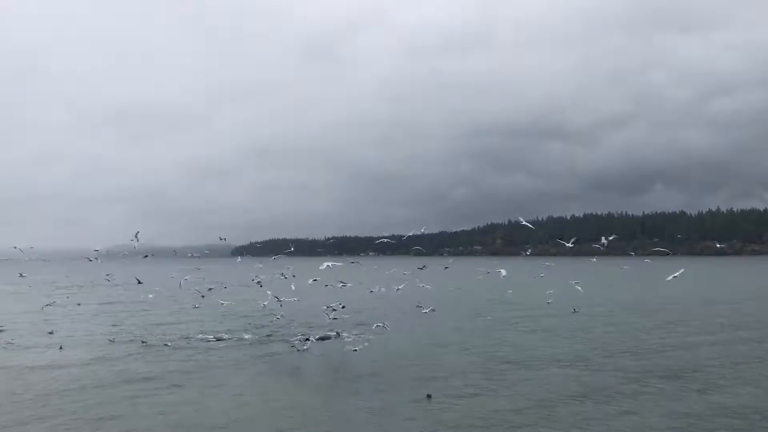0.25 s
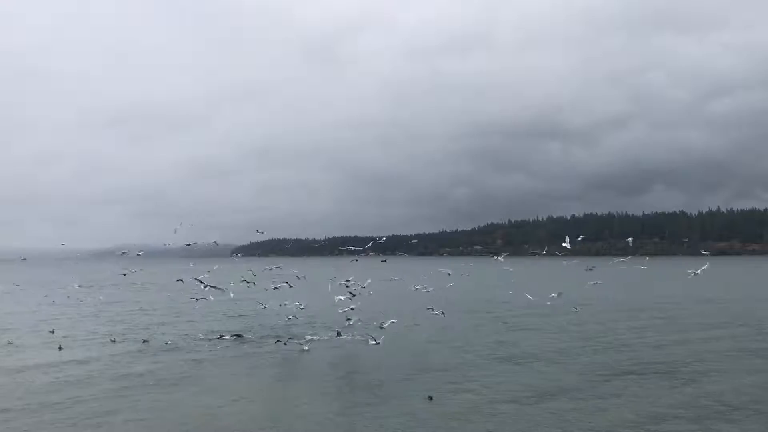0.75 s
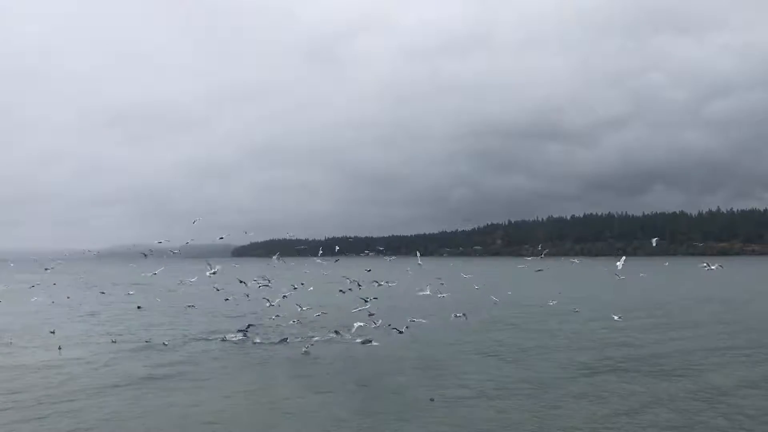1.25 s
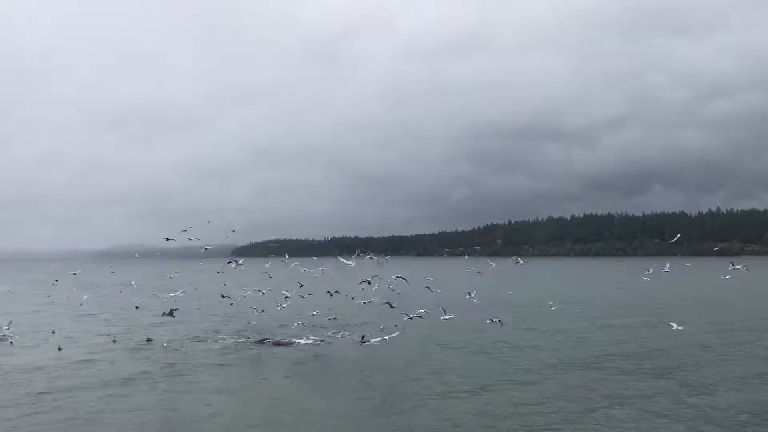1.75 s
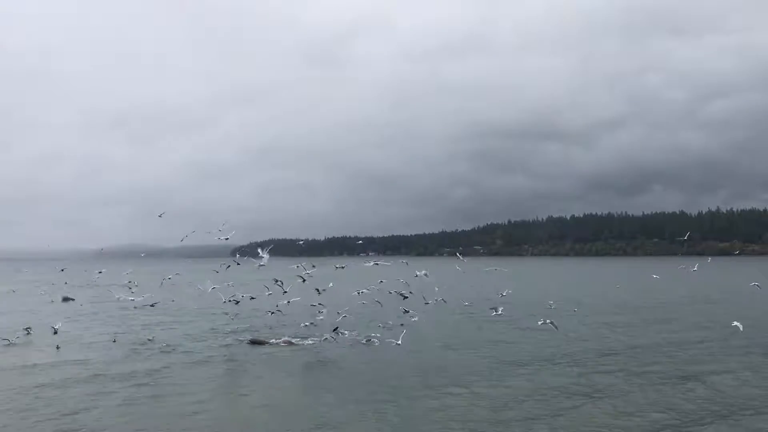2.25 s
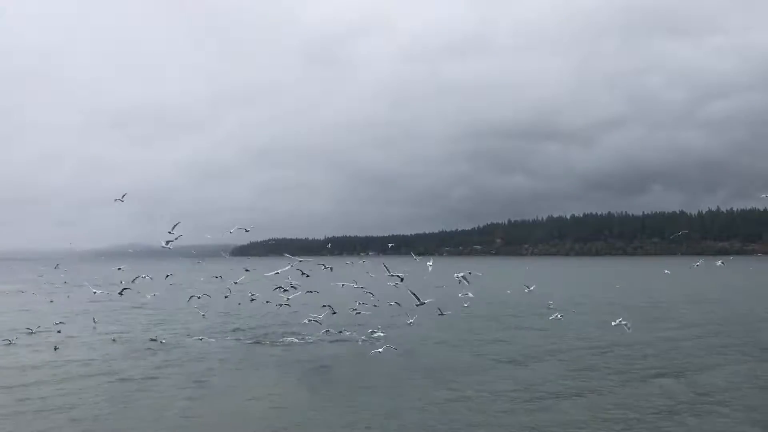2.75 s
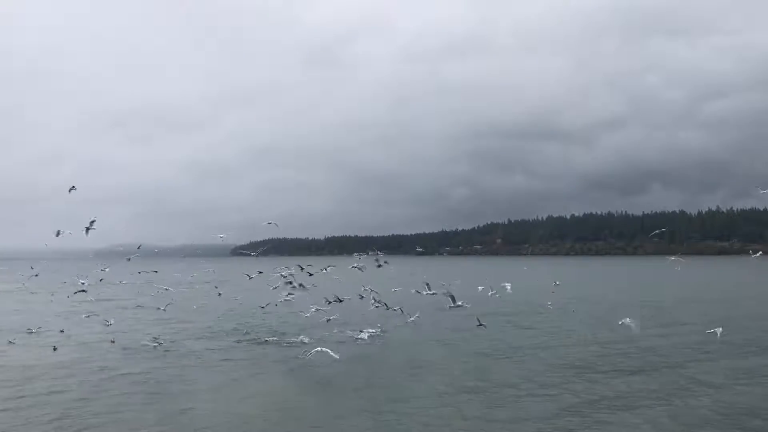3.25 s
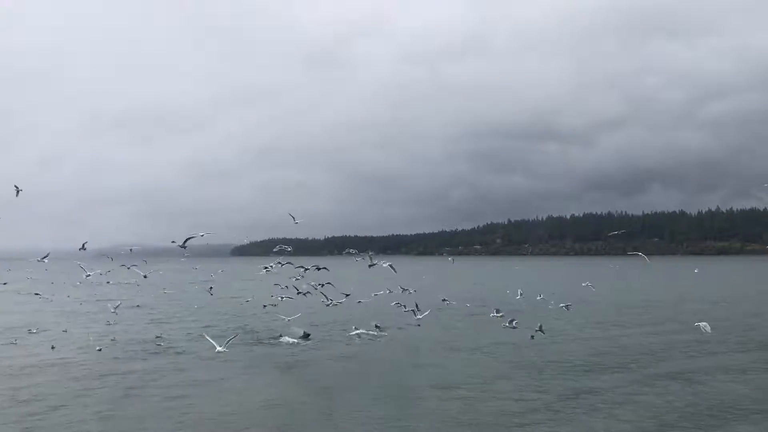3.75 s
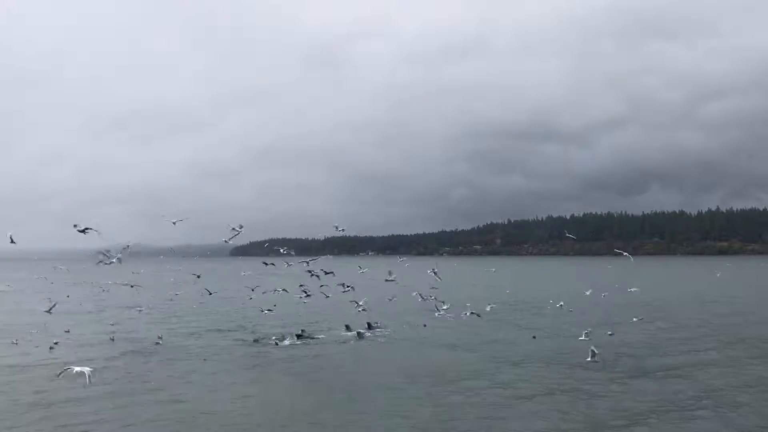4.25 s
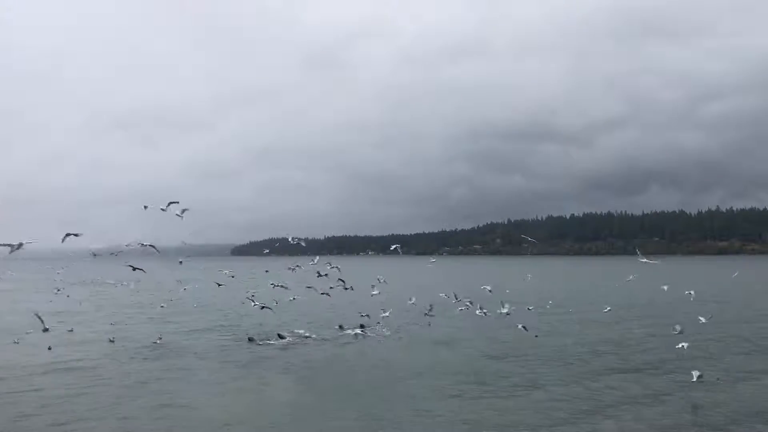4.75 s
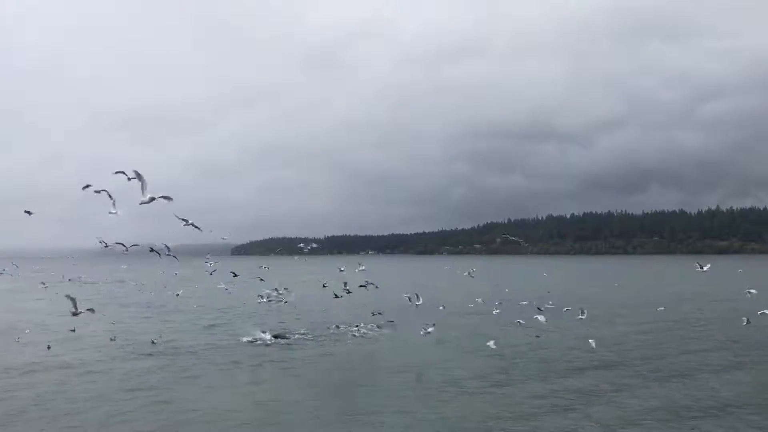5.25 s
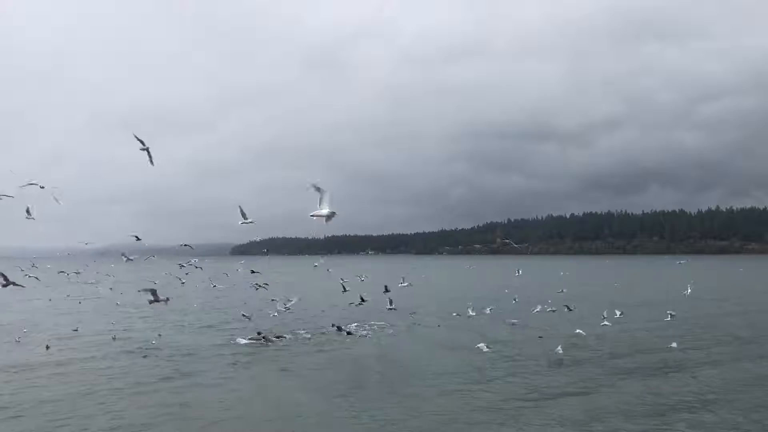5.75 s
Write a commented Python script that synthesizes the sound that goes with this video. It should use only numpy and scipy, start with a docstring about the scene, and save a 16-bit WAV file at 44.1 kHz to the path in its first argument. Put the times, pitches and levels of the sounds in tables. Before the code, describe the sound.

Many gulls feeding over a bay cry in short, clear, mostly falling yelps, overlapping thickly, with brief hoarse squawks between and a blurred chorus farther off. The calls are densest in the first half and around two to three seconds, then grow sparser. Soft water wash and faint hissing splashes lie below. Wind rumbles and bumps on the microphone. Open outdoor space, dull faint reflections, mono.

```python
"""Gulls feeding over a bay: near birds give short clear cries, hoarse squawks between, far ones blur to a chorus.
Cries are stacks of partials on gliding pitches; a few dull reflections follow them.
Water washes, sprays and ticks below: flickering noise bands and high-passed clicks.
Wind rumbles, flutters and buffets on the microphone port: low noise bands under swells and puffs."""
import sys
import numpy as np
from scipy import signal
from scipy.io import wavfile
from scipy.ndimage import uniform_filter1d

SR = 44100
rng = np.random.default_rng(int(sys.argv[2]) if len(sys.argv) > 2 else 0)


def volts_from_db(level):
    """Convert decibel levels to linear amplitude ratios."""
    exponent = np.asarray(level, float) / 20
    return 10 ** exponent


def transcribe(signal):
    """Save signal, clipped to [-1, 1], as a 16-bit WAV file at the path in sys.argv[1]."""
    frames = np.atleast_2d(signal).T
    limited = np.clip(frames, -1, 1)
    pcm = np.round(limited * 32767).astype(np.int16)
    wavfile.write(sys.argv[1], SR, pcm)


N = 265041

# throat response of far birds and squawks: freq_hz, gain_db
THROAT = [(1000, -3.5), (1500, -1), (2200, -3), (3200, 4), (4500, -10.5), (7000, -18.5), (11000, -48.5)]


def rms_one(x):
    return x / np.sqrt(np.mean(x ** 2) + 1e-20)


def in_time(rows):
    """Each column after the first, interpolated over time to every sample."""
    s, *columns = np.transpose(rows)
    return [np.interp(np.arange(N) / SR, s, c) for c in columns]


def at_hz(points, hz):
    """Spectrum in dB, interpolated over log frequency."""
    points_hz, points_db = np.array(points).T
    return np.interp(np.log(hz), np.log(points_hz), points_db)


def drift(rate_hz):
    """Slow random drift, rms 1: noise at SR/20 through a double one-pole low-pass."""
    r = np.exp(-40 * np.pi * rate_hz / SR)
    white = rng.standard_normal(N // 20 + 2002)
    slow = signal.lfilter([1], [1, -2 * r, r * r], white)[2000:]  # settled part
    return np.interp(np.arange(N) / 20, np.arange(len(slow)), rms_one(slow))


def coloured_noise(spectrum, patchiness, rate_hz):
    """Half-octave noise bands with partly shared level flicker; rms 1."""
    lowest_hz, highest_hz = spectrum[0][0], spectrum[-1][0]
    edges_hz = lowest_hz * 2 ** np.arange(0, np.log2(highest_hz / lowest_hz) + .25, .5)
    white = rng.standard_normal((2, N))
    shared, out = drift(rate_hz), 0
    for k, (low_hz, high_hz) in enumerate(zip(edges_hz, edges_hz[1:])):
        sos = signal.butter(2, [low_hz, high_hz], "band", fs=SR, output="sos")
        band = signal.sosfilt(sos, white[k % 2])
        flicker_db = patchiness * (0.98 * shared + 0.72 * drift(rate_hz))
        out = out + band * volts_from_db(at_hz(spectrum, np.sqrt(low_hz * high_hz)) + flicker_db)
    return rms_one(out)


def add(out, cry, voice_db, waver, tremble, edge_s=.005):
    """Adds one cry: partials of a gliding, wavering pitch, each trembling in level."""
    s, hz, db = np.transpose(cry)
    first = max(int((s[0] - edge_s) * SR), 0)
    span = np.arange(first, min(int((s[-1] + edge_s) * SR), N))
    t = span / SR
    glide_hz = uniform_filter1d(np.interp(t, s, hz), size=300, mode="nearest")
    phase = 2 * np.pi * np.cumsum(glide_hz * waver[span]) / SR
    edges = np.clip(np.minimum(t - t[0], t[-1] - t) / edge_s, 0, 1)
    stack = 0
    for k, partial_db in enumerate(voice_db, 1):
        if partial_db > -38 and k * hz.max() < 16000:
            own_tremble = np.roll(tremble, 7919 * k + 3 * span[0])[:len(span)]
            stack = stack + volts_from_db(partial_db) * np.sin(k * phase) * own_tremble
    out[span] += np.sqrt(2) * volts_from_db(np.interp(t, s, db)) * edges * stack


def voice(hz, tilt_db):
    """Partials tilted by effort and coloured by the throat; the strongest is 0 dB."""
    # near throat response: freq_hz, gain_db
    near_throat = [(1000, 0), (1500, -3.5), (2200, -0.5), (3200, 1), (4500, -7.5), (7000, -21.5),
                   (10000, -31.5), (13000, -46), (16000, -55)]
    k = np.arange(1, 11)
    effort_db = tilt_db * np.log2(np.minimum(k, 2))  # one step, from the second partial up
    upper_loss_db = 3 * np.maximum(k - 2, 0)
    db = effort_db - upper_loss_db + at_hz(near_throat, hz * k)
    return db - db.max()


def envelope(u, length_s):
    """Cry level in dB over u = 0-1: quick rise, sagging hold, release."""
    attack_s, rise_db, hold_share, release_db, sag_db_per_s = 0.022, 8, 0.82, 9, 37
    rise = min(attack_s / length_s, .4)
    shape_db = np.interp(u, [0, rise, hold_share, 1], [-rise_db, 0, 0, -release_db])
    return shape_db - sag_db_per_s * length_s * u


def near_gulls():
    """Gliding cries fall early or rise late; warbles swing about a pitch; contoured cries follow pitch curves."""
    # gliding cries: start_s, length_s, first_pitch_hz, last_pitch_hz, strongest_partial_db, tilt_db
    cries = [ (0.005, 0.015, 2870, 2800, -41.5, -8), (2.2, 0.11, 4650, 4350, -47, -8),
             (2.04, .06, 4450, 4300, -50, -8), (0.064, 0.28, 2940, 2695, -32, -20),
             (0.068, 0.12, 3080, 2840, -40.5, 4), (0.16, 0.049, 3390, 3520, -32.5, -5),
             (0.31, .09, 3250, 3100, -46, -8), (0.395, .035, 3050, 2950, -43, -8),
             (0.7, .06, 3050, 2800, -44, -8), (0.955, .04, 2600, 2620, -48, 12),
             (0.21, .1, 4120, 3880, -41, -11), (0.201, .12, 1400, 1240, -44.5, -4.5),
             (0.34, 0.039, 2530, 2100, -42, -26), (0.374, 0.03, 1990, 1885, -30, -11),
             (0.432, .022, 2880, 2800, -38, -8), (0.453, 0.029, 2690, 2714, -33.5, 0.5),
             (0.442, .02, 1907, 1915, -39, -20), (0.514, 0.024, 2690, 2450, -32, 1.5),
             (0.48, .07, 3480, 3410, -38.5, -2), (0.567, 0.027, 3380, 3320, -40.5, -4),
             (0.576, .022, 2680, 2220, -39, -8), (0.588, 0.021, 2430, 2250, -41.5, 7),
             (0.609, 0.075, 3370, 3200, -34, -17), (0.612, 0.027, 1322, 1260, -36, -14),
             (0.68, 0.029, 3820, 3870, -36, -16), (0.656, .022, 2340, 2260, -41, -13),
             (0.669, 0.021, 2793, 2580, -34.5, -18), (0.671, 0.017, 1373, 1324, -36, -24),
             (0.674, 0.088, 1520, 1380, -41, -8), (0.689, 0.041, 2450, 2320, -40.5, -17),
             (1.16, .02, 8800, 9800, -60, -8), (1.245, .03, 8000, 9800, -60, -8),
             (1.37, 0.046, 5200, 4700, -48, -8), (1.102, .06, 3060, 2750, -43, -8),
             (0.684, .22, 4540, 4400, -62, -6), (0.928, 0.052, 3640, 3760, -47, 15.5),
             (0.97, 0.026, 3900, 3930, -41, -5), (0.782, 0.037, 1450, 1490, -41, -10),
             (0.85, 0.033, 3820, 3675, -39.5, -8), (0.853, 0.16, 1902, 1672, -39.5, -10),
             (0.974, 0.037, 1319, 1300, -43, 9), (1.02, 0.028, 3510, 3550, -40, 6),
             (1.026, .065, 2580, 2340, -41, -7), (1.05, 0.042, 3100, 2990, -36, -10),
             (1.072, 0.087, 1570, 1330, -27.5, -16.5), (1.076, 0.055, 1654, 1600, -34.5, -10),
             (1.127, 0.1, 1793, 1624, -37, 4), (1.16, 0.13, 4460, 4130, -44, 6.5),
             (1.244, 0.11, 2795, 2840, -46, 16), (1.274, 0.035, 3440, 3450, -42, -10),
             (1.336, .025, 3360, 3210, -44, -8), (1.37, .085, 3360, 3330, -34, -5),
             (1.396, 0.023, 5570, 5660, -47, -6), (1.53, .09, 3150, 3050, -44, -8),
             (1.715, .025, 4050, 4000, -46, -8), (1.7, .02, 2200, 2180, -44, -12),
             (1.84, .025, 2450, 2550, -45, -8), (1.92, .025, 3750, 3850, -47, -8),
             (1.28, .05, 2620, 2770, -45, -8), (1.39, .04, 2750, 2850, -43, -8),
             (1.512, .03, 3760, 3870, -42, -4), (1.517, 0.25, 3506, 3140, -37, -1),
             (1.592, 0.015, 3800, 3750, -43, -8), (1.664, 0.036, 3020, 2920, -38.5, -3),
             (1.863, 0.01, 3240, 3150, -47, -8), (1.887, .025, 3230, 3160, -43.5, -8),
             (2.039, 0.2, 1830, 1660, -42.5, 3), (2.105, 0.021, 2550, 2430, -37, -3),
             (2.105, 0.028, 4160, 4160, -43, -8), (2.13, 0.048, 2040, 2100, -40, -20),
             (1.12, 0.085, 3560, 3200, -49, -8), (4.218, .11, 4600, 4540, -47, -8),
             (4.4, 0.026, 5000, 5000, -50, -8), (2.13, 0.078, 3225, 3170, -33, -1),
             (2.22, 0.14, 2557, 2485, -43, -1), (2.343, 0.058, 1830, 1686, -38, 1.5),
             (2.35, 0.039, 3160, 3250, -37, 1), (2.374, 0.031, 2770, 2680, -34.5, -17),
             (2.407, 0.065, 2820, 2790, -38, -8), (2.421, 0.027, 4370, 4300, -37, -14),
             (2.441, 0.038, 4320, 4400, -37, 2), (2.442, .05, 984, 1055, -38.5, -25),
             (2.485, .065, 4070, 4260, -35.5, -4), (2.471, .04, 3350, 3190, -31, -8),
             (2.498, 0.13, 1526, 1390, -42, -10), (2.507, 0.047, 2713, 2790, -31.5, -7),
             (2.526, 0.03, 3710, 3560, -31.5, -4), (2.56, 0.045, 3440, 3510, -38, -12),
             (2.547, 0.1, 2960, 2550, -34, -13), (2.62, 0.094, 2585, 2480, -35, -9),
             (2.623, 0.017, 3300, 3150, -29, -2), (2.7, 0.031, 2480, 2385, -30.5, -6),
             (2.68, 0.051, 1412, 1375, -37, 2.5), (2.707, 0.016, 4110, 4180, -40, 0),
             (2.753, 0.12, 2450, 2400, -40, -1), (2.777, 0.099, 4260, 4044, -31.5, -13),
             (2.78, 0.097, 2100, 2010, -47, -20), (2.872, .26, 3480, 3200, -53, 16),
             (2.609, 0.034, 5120, 5220, -41, -12), (2.455, .085, 8650, 8200, -58, -8),
             (2.777, 0.018, 3780, 3530, -33, -8), (2.892, 0.078, 4000, 3990, -48, -8),
             (2.856, .112, 2890, 2650, -41.5, -5), (2.892, 0.039, 3150, 2880, -40.5, -6),
             (2.9, 0.075, 1444, 1386, -42.5, -11), (2.91, 0.18, 1907, 1875, -42.5, 2),
             (3.048, 0.041, 3740, 3570, -44, -8), (2.919, 0.078, 1830, 1626, -39.5, -19),
             (3.034, 0.19, 1674, 1552, -34.5, -21), (3.19, 0.057, 1639, 1493, -33.5, -29),
             (3.001, 0.053, 1311, 1278, -39.5, -3), (3.13, 0.028, 3490, 3520, -40, 0),
             (3.224, 0.027, 2670, 2470, -42.5, -8), (3.269, .02, 2540, 2720, -36.5, -8),
             (3.255, 0.023, 2110, 2060, -35.5, -20), (3.269, 0.032, 4120, 4430, -41, -14),
             (3.297, 0.023, 3630, 3580, -35.5, -1), (3.878, 0.055, 3050, 2980, -40.5, 1),
             (3.93, 0.03, 2960, 2880, -32.5, -7), (3.5, 0.038, 1434, 1380, -40, -12),
             (3.614, 0.024, 3760, 3980, -43, -8), (3.62, 0.12, 2900, 2740, -44, 1),
             (3.749, 0.17, 2580, 2350, -45, -1), (3.957, 0.041, 4430, 4300, -41, -8),
             (3.94, 0.049, 3650, 3900, -37, -12), (3.985, 0.21, 3394, 3084, -28.5, -3.5),
             (4.18, 0.053, 3150, 3140, -34.5, 4), (4.203, 0.074, 3710, 3470, -35.5, 1),
             (3.478, .022, 2480, 2680, -38, -12), (3.503, .025, 2450, 2400, -36, -12),
             (3.55, .022, 2500, 2660, -37, -12), (3.578, .035, 2450, 2250, -33, -12),
             (3.55, .022, 3750, 3950, -39.5, -8), (3.58, .018, 3950, 3750, -42, -8),
             (3.335, .03, 1200, 1300, -42, -20), (3.78, .05, 3520, 3500, -45, -8),
             (3.105, .07, 4900, 5200, -48, -8), (3.07, .025, 2600, 2520, -42, -8),
             (3.68, .03, 2200, 2000, -44, -12), (3.96, .04, 3420, 3440, -42, -8),
             (4.33, .04, 3470, 3450, -40, -3), (4.49, 0.035, 3560, 3490, -45, -8),
             (4.498, 0.02, 1526, 1560, -36, -14.5), (4.56, 0.021, 3600, 3530, -44, -8),
             (4.667, 0.079, 3274, 3157, -31.5, -1), (4.63, .13, 2150, 2140, -45, -12),
             (4.69, .055, 4850, 4720, -50, -8), (4.55, .04, 1200, 1190, -42, -25),
             (4.21, .04, 4050, 3980, -44, -8), (4.26, .05, 2500, 2480, -47, -8),
             (4.16, .03, 3580, 3500, -44, -8), (2.39, .09, 3680, 3600, -40, -8),
             (2.33, .08, 4420, 4380, -52, -8), (2.64, .09, 2850, 2830, -41, 4),
             (2.64, .025, 2400, 2150, -41, -8), (2.74, .09, 5300, 5200, -50, -8),
             (2.82, .05, 3330, 3320, -43, -8), (2.92, .08, 3650, 3300, -45, -8),
             (2.86, .06, 4950, 4700, -50, -8), (4.642, 0.016, 1640, 1730, -42, 5),
             (4.746, 0.12, 4620, 4500, -44.5, -1.5), (4.702, 0.077, 4060, 3600, -43, -10),
             (4.848, 0.11, 3796, 3530, -40, -4), (4.88, .05, 4450, 4250, -45, -10),
             (4.853, 0.043, 3420, 3524, -48, -8), (4.916, 0.014, 2200, 1970, -39, -13),
             (4.952, 0.025, 1820, 1980, -42.5, -11), (4.965, 0.032, 3350, 3520, -46, -6),
             (4.977, 0.015, 3100, 2940, -43, 6), (5.039, 0.032, 2340, 2550, -43, -11),
             (5.065, 0.014, 2930, 3070, -44, 6), (5.363, 0.05, 4380, 4310, -42, 2),
             (5.425, 0.033, 4220, 4240, -39.5, 5), (5.352, 0.023, 1455, 1600, -37.5, 2),
             (5.28, 0.014, 6180, 6150, -51, -8), (5.765, .015, 5950, 6000, -50, -8),
             (5.515, .025, 5900, 5800, -49, -8), (2.82, 0.092, 2950, 2800, -45, 9),
             (2.86, 0.13, 1940, 1880, -47, 10), (5.453, 0.026, 3630, 3510, -39, 4),
             (5.512, 0.033, 3400, 3260, -35.5, 2), (5.625, .045, 1330, 1360, -43, -20),
             (5.7, .1, 1400, 1415, -46, -20), (5.808, 0.18, 1638, 1480, -44.5, -24),
             (5.794, 0.089, 4600, 4360, -49, -8), (5.906, .065, 4190, 4150, -51, -4)]
    # warbling cries: start_s, length_s, pitch_hz, swing_hz, swing_rate_hz, strongest_partial_db, tilt_db
    warbles = [(3.33, 0.072, 2540, 90, 16.7, -31, 0), (3.405, 0.053, 2390, 97, 14, -36, -4.5),
               (3.505, 0.032, 3870, 80, 27, -40.5, -8), (3.625, .12, 2620, 90, 15, -40.5, 6.5),
               (4.8, 0.13, 3500, 80, 15.5, -42, -8), (4.42, 0.13, 4400, 200, 12, -53.5, -8)]
    # contoured cries, each with its own pitch curve: time_s, pitch_hz, level_db
    contoured_cries = [
        [(0.055, 1900, -46), (0.075, 1920, -38), (0.11, 1770, -38), (0.16, 1700, -42), (0.24, 1580, -47),
         (0.33, 1500, -50), (0.44, 1480, -54)],
        [(0.068, 1510, -48), (0.085, 1550, -40), (0.115, 1490, -39), (0.135, 1380, -43), (0.16, 1285, -55)],
        [(0.612, 4030, -50), (0.66, 3780, -45), (0.72, 3680, -49), (0.8, 3660, -44), (0.835, 3680, -53)],
        [(1.467, 3010, -41), (1.502, 2920, -36.5), (1.549, 2800, -42), (1.66, 2850, -49)],
        [(4.223, 3120, -46), (4.281, 3100, -40), (4.328, 2980, -42), (4.425, 2770, -45.5), (4.45, 2630, -52)],
        [(5.376, 2505, -48), (5.396, 2372, -39.5), (5.438, 2370, -38.5), (5.476, 2541, -34), (5.493, 2720, -53)],
        [(5.528, 2512, -46), (5.555, 2476, -38), (5.583, 2243, -41.5), (5.605, 2275, -40), (5.623, 2300, -56)],
    ]
    # their partials, one row per cry, first partial up: level_db
    contoured_voices = [(-4, 0, -30, -24), (-4, 0, -8, -14, -19, -26, -28, -28, -29), (0, -18.5, -23),
                        (0, -16), (0, -6, -28, -26), (0.5, -13, -29, -28, -23), (0, -8, -24)]
    out = np.zeros(N)
    waver, tremble = 1 + 0.0041 * drift(58.0), volts_from_db(2.26 * drift(47.0))
    u = np.linspace(0, 1, 21)
    for s, length_s, first_hz, last_hz, db, tilt_db in cries:
        bend = .7 if last_hz < first_hz else 1.59
        hz = first_hz + (last_hz - first_hz) * u ** bend
        cry = np.c_[s + length_s * u, hz, db + envelope(u, length_s)]
        add(out, cry, voice(hz.mean(), tilt_db), waver, tremble)
    for s, length_s, hz, swing_hz, rate_hz, db, tilt_db in warbles:
        swung_hz = hz - swing_hz * np.sin(2 * np.pi * rate_hz * length_s * u)
        cry = np.c_[s + length_s * u, swung_hz, db + envelope(u, length_s)]
        add(out, cry, voice(hz, tilt_db), waver, tremble)
    for cry, voice_db in zip(contoured_cries, contoured_voices):
        add(out, cry, voice_db, waver, tremble)
    return out


def squawks():
    """Low hoarse barks: partials of an unsteady pitch through the throat, level torn by breath noise."""
    # squawks: start_s, gain_db (ahead of the throat), length_s, final_pitch_hz
    barks = [(0.08, -66, 0.056, 770), (0.985, -49.5, 0.043, 714), (1.069, -48.5, 0.044, 417),
             (1.382, -53, 0.059, 560), (2.107, -50, 0.034, 842), (2.15, -46, 0.019, 531),
             (2.216, -49, 0.021, 476), (2.269, -48.5, 0.023, 499), (2.322, -48.5, 0.027, 520),
             (2.382, -45, 0.035, 496), (2.426, -43, 0.018, 500), (2.485, -63, 0.03, 500),
             (2.523, -48, 0.0284, 501), (2.595, -44, 0.046, 463), (2.67, -44.5, 0.013, 501),
             (2.703, -58, 0.014, 500), (2.843, -44.5, 0.068, 950), (3.263, -50, 0.029, 513),
             (3.293, -50, 0.021, 708)]
    out = np.zeros(N)
    waver, tremble = 1 + 0.022 * drift(120.0), volts_from_db(4.2 * drift(190.0))
    for s, db, length_s, hz in barks:
        cry = [(s, 0.89 * hz, db - 14.5), (s + 0.603 * length_s, 1.2 * hz, db), (s + length_s, hz, db - 5)]
        add(out, cry, at_hz(THROAT, hz * np.arange(1, 27)), waver, tremble, edge_s=0.0044)
    return out


def far_flock(count=480):
    """Many short, hoarse, falling cries at random moments through one throat, under a chorus level curve."""
    # chorus: time_s, level_db
    chorus = [(0.0, -56), (0.2, -62), (0.35, -43), (0.7, -46), (0.9, -48.5), (1.1, -37.5), (1.25, -49),
              (1.4, -41.5), (1.6, -48), (2.0, -62), (2.15, -42), (2.45, -40), (2.75, -41.5), (3.05, -38.5),
              (3.35, -51.5), (3.65, -43.5), (3.95, -44.5), (4.25, -40), (4.6, -53), (4.85, -47),
              (5.15, -53), (5.3, -43), (5.5, -52.5), (5.75, -44), (6.0, -58)]
    out = np.zeros(N)
    waver, tremble = 1 + 0.012 * drift(96.0), volts_from_db(4.1 * drift(74.0))
    for when, high, long, fall, faint in rng.random((count, 5)):
        s = when * (N / SR - .1)
        hz = 1050 * 2 ** (1.2 * high)
        length_s = 0.0194 + 0.075 * long ** 2
        last_hz = hz * (1 - 0.0643 * fall)
        cry = [(s, hz * 1.03, -8), (s + 0.277 * length_s, hz, 0), (s + length_s, last_hz, -9)]
        add(out, cry, at_hz(THROAT, hz * np.arange(1, 6)) - 10.0 * faint, waver, tremble)
    chorus_db, = in_time(chorus)
    return volts_from_db(chorus_db) * rms_one(out)


def over_water(x):
    """Eight dull, late reflections off water and shore, weaker with delay."""
    dull = signal.lfilter([.45], [1, -.55], x)
    lags = (SR * rng.uniform(0.0056, .09, 8)).astype(int)
    return sum(np.pad(dull, (lag, 0))[:N] * volts_from_db(-120 * lag / SR) for lag in lags)


def splashing():
    """Spray level in dB: a steady floor, splashes swelling and dying over it, summed in power."""
    # birds hitting the surface: peak_time_s, peak_db, half_width_s (to 1/e of power)
    splashes = [(0.02, -65, .05), (0.6, -70, .15), (0.98, -59, 0.093), (1.4, -64, .08), (2.15, -65, 0.13),
                (2.45, -64, 0.12), (2.89, -64, .09), (2.71, -63, .02), (3.3, -73, .05), (3.65, -64, 0.11),
                (3.95, -62, 0.11), (4.23, -54.5, .06), (4.41, -59.5, .04), (4.8, -64.5, 0.22),
                (5.24, -60, .07), (5.5, -60, 0.14), (5.73, -55, 0.056), (5.95, -63, 0.11)]
    floor_db = -68.5
    t, power = np.arange(N) / SR, volts_from_db(floor_db) ** 2
    for s, db, width_s in splashes:
        power = power + volts_from_db(db) ** 2 * np.exp(-((t - s) / width_s) ** 2)
    return 10 * np.log10(power)


def water():
    """Broad wash noise, brighter spray when birds hit the surface, and high-passed clicks for close drops."""
    # wash level: time_s, level_db
    waves = [(0.0, -40), (0.2, -42), (0.65, -42.5), (0.95, -44), (1.15, -38.5), (1.7, -44), (2.0, -40),
             (2.3, -50.5), (2.6, -43.5), (3.35, -43), (3.5, -40.5), (3.8, -40.5), (4.25, -40.5),
             (4.55, -40.5), (4.7, -47), (5.0, -46.5), (5.15, -40), (5.45, -45), (5.75, -39), (6.0, -41.5)]
    # wash spectrum: freq_hz, relative_density_db (per Hz)
    wash_spectrum = [(200, -7.5), (600, -2), (1000, -1), (1500, -5.5), (2500, -11), (4000, -16.5),
                     (6000, -26), (9000, -30)]
    # spray spectrum: freq_hz, relative_density_db (per Hz)
    spray_spectrum = [(3000, -44), (6000, 1.5), (9000, 24), (12000, -15), (15500, 15)]
    # drops ticking close by: time_s, impulse_db (ahead of the high-pass)
    drops = [(1.8988, -32), (1.8996, -26)]
    wash_db, = in_time(waves)
    wash = volts_from_db(wash_db) * coloured_noise(wash_spectrum, patchiness=1.05, rate_hz=30.0)
    spray = volts_from_db(splashing()) * coloured_noise(spray_spectrum, patchiness=1.3, rate_hz=12.0)
    ticks = np.zeros(N) + 1e-18
    for s, db in drops:
        ticks[int(s * SR)] = volts_from_db(db)
    ticks = signal.sosfilt(signal.butter(4, 7500, "high", fs=SR, output="sos"), ticks)
    return wash + spray + ticks


def gusting(swell_db, column):
    """Gain of the slow wind swells with every puff added in power as a short bell."""
    # puffs riding on the wind: peak_time_s, rumble_db, flutter_db
    puffs = [(0.02, -30, -28.5), (0.16, -28, -44), (0.31, -28.5, -44), (0.45, -40, -52),
             (0.6, -29.5, -32.5), (0.74, -26, -46), (0.96, -30.5, -56), (1.1, -27, -32), (1.32, -29, -42),
             (1.6, -31, -36), (1.72, -20.5, -51), (1.89, -29, -30), (2.06, -26, -33), (2.11, -24, -32),
             (2.19, -23.5, -48), (2.3, -31, -30.5), (2.4, -42, -30.5), (2.61, -29, -39.5),
             (3.12, -26, -37.5), (3.26, -37, -32.5), (3.33, -26, -48), (3.5, -33, -47), (3.91, -28.5, -41),
             (4.27, -31.5, -67), (4.49, -29, -42), (4.56, -38, -28.5), (4.63, -35, -26.5),
             (4.74, -29.5, -33.5), (4.92, -29.5, -42), (4.99, -26, -39), (5.42, -22.5, -27.5),
             (5.5, -26, -26.5), (5.71, -29, -47), (5.85, -24, -29), (6.0, -27, -39)]
    half_width_s = .035  # to 1/e of power
    power, t = volts_from_db(swell_db) ** 2, np.arange(N) / SR
    for puff in puffs:
        power = power + volts_from_db(puff[column]) ** 2 * np.exp(-((t - puff[0]) / half_width_s) ** 2)
    return np.sqrt(power)


def buffets():
    """Short low eddies: levelled band noise under a bell envelope, reaching above the rumble."""
    # buffets: start_s, gain_db (ahead of a 6 dB cut), length_s, eddy_hz
    bursts = [(1.051, -15, 0.033, 71), (1.121, -14, 0.025, 80.6), (1.855, -20, 0.034, 80),
              (2.354, -9, 0.02, 72.7), (2.383, -11.5, 0.011, 72.4), (3.246, -15, 0.015, 217),
              (3.271, -16.5, 0.016, 169), (3.32, -9.5, 0.016, 125), (3.49, -22, 0.022, 80),
              (4.551, -9.5, 0.0096, 190), (4.568, -10, 0.024, 137), (4.59, -4, 0.02, 209),
              (4.601, -3, 0.027, 73.7), (4.707, -8.5, 0.028, 133.7), (4.743, -17, 0.029, 85.5),
              (4.867, -16, 0.016, 93), (4.972, -12.5, 0.024, 74.5), (5.493, -19.5, 0.046, 231),
              (5.844, -12.5, 0.016, 162)]
    out, white = np.zeros(N), rng.standard_normal(N)
    for s, db, length_s, hz in bursts:
        span = np.arange(int((s - .05) * SR), min(int((s + .12) * SR), N))
        band = signal.butter(1, [0.886 * hz, 1.16 * hz], "band", fs=SR, output="sos")
        eddy = signal.sosfilt(band, white[span])
        eddy = signal.sosfilt(signal.butter(2, 3.6 * hz, fs=SR, output="sos"), eddy)
        eddy /= np.sqrt(uniform_filter1d(eddy ** 2, size=600) + 1e-9)  # every buffet gets its full push
        half_s = length_s / 2
        bell = np.exp(-((span / SR - s - half_s) / max(half_s, .002)) ** 2)
        out[span] += volts_from_db(db - 6.0) * bell * eddy
    return out


def wind():
    """Eddies on the port: lumpy rumble, faster flutter above it, and short buffets."""
    # slow wind swells under the puffs: time_s, rumble_db, flutter_db
    swells = [(0.0, -33, -36.5), (0.22, -26.5, -36.5), (1.04, -34, -41.5), (1.54, -34, -44.5),
              (1.76, -29.5, -41.5), (2.23, -24.5, -37), (2.46, -28, -33), (2.59, -39, -45),
              (2.84, -39, -41), (3.18, -30, -42), (3.53, -39, -43.5), (4.44, -39.5, -42.5),
              (4.65, -40, -33), (4.87, -42, -50), (5.02, -46, -43), (5.24, -40.5, -43.5),
              (5.52, -35, -38.5), (6.01, -58, -57)]
    # rumble spectrum: freq_hz, relative_density_db (per Hz)
    rumble_spectrum = [(25, -51), (40, -2), (60, -1.5), (90, -13.5), (130, -17.5)]
    # flutter spectrum: freq_hz, relative_density_db (per Hz)
    flutter_spectrum = [(90, 4.5), (140, -3), (250, -5), (450, -22), (900, -25.5)]
    rumble_db, flutter_db = in_time(swells)
    rumble = gusting(rumble_db, column=1) * coloured_noise(rumble_spectrum, patchiness=2.0, rate_hz=8.9)
    flutter = gusting(flutter_db, column=2) * coloured_noise(flutter_spectrum, patchiness=2.2, rate_hz=12.8)
    return rumble + flutter + buffets()


def scene():
    """Gulls with their reflections, over water and wind; one channel."""
    gulls = near_gulls() + squawks() + far_flock()
    reflections = volts_from_db(-18.5) * over_water(gulls)
    return (gulls + reflections + water() + wind())[None]


def low_pass(x):
    """Removes everything above the highest recorded frequency."""
    return signal.sosfilt(signal.butter(12, 16530, fs=SR, output="sos"), x)


def record(dry):
    """The microphone path cuts the deepest bass, below 38 Hz."""
    mix = signal.sosfilt(signal.butter(3, 38, "high", fs=SR, output="sos"), dry)
    return low_pass(mix)


dry = scene()
out = record(dry)
transcribe(out)
```